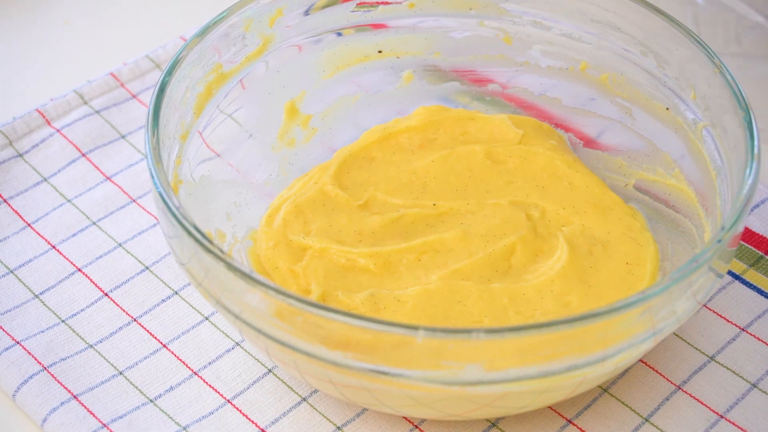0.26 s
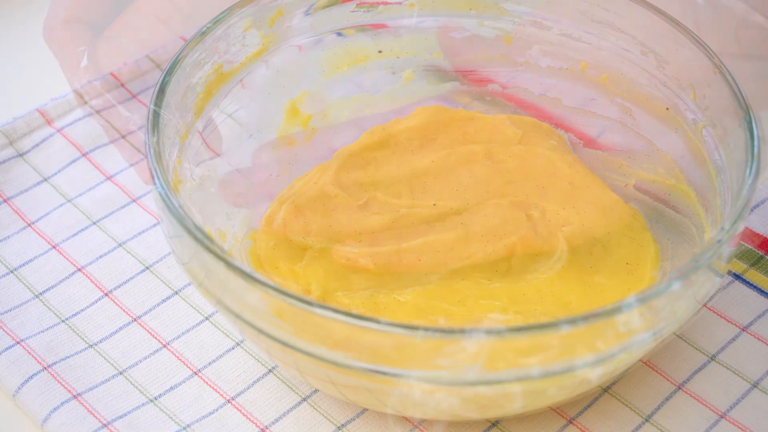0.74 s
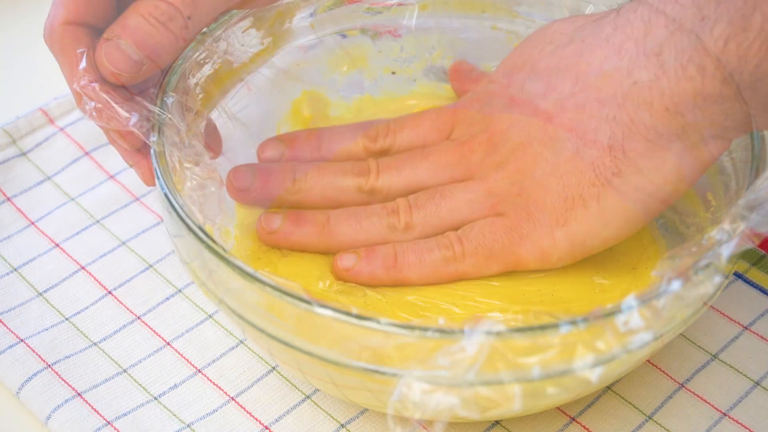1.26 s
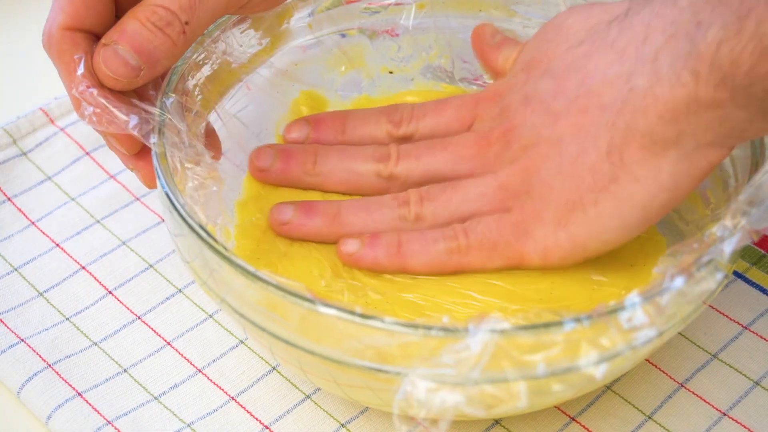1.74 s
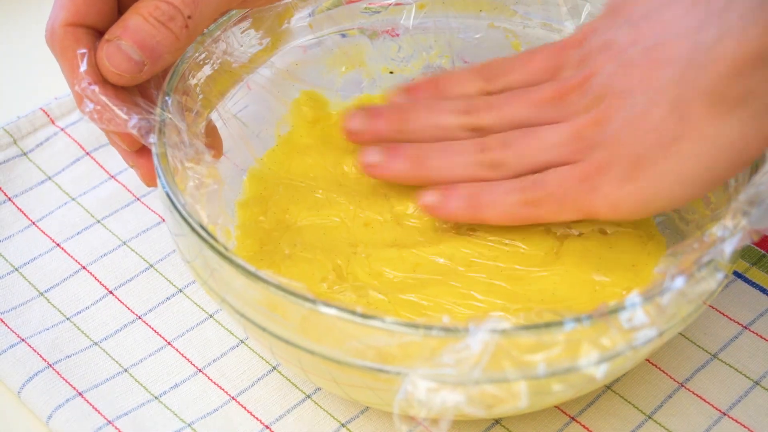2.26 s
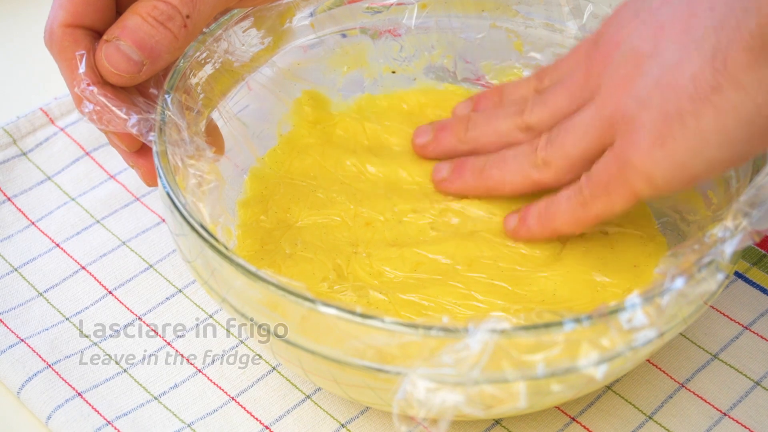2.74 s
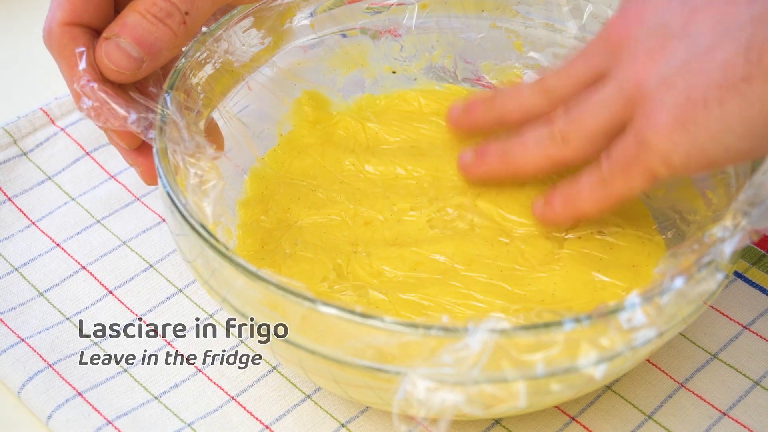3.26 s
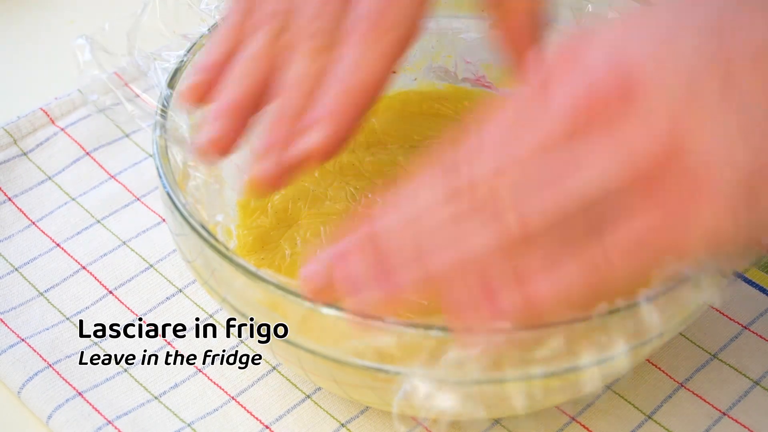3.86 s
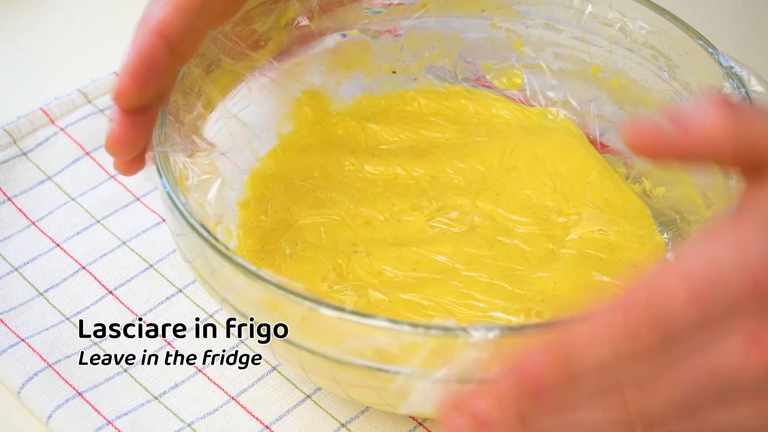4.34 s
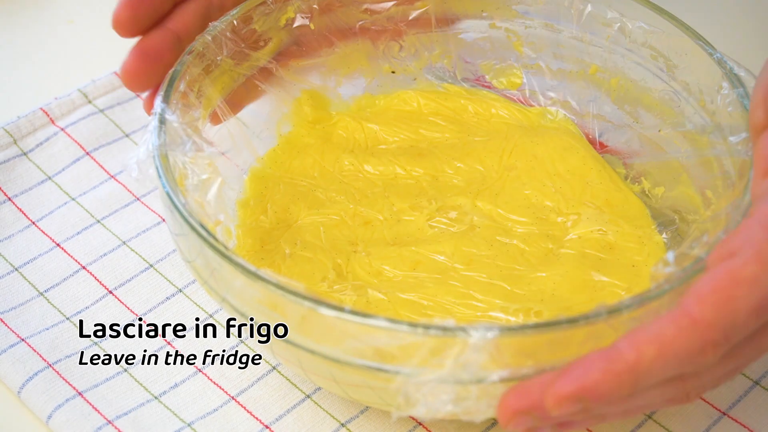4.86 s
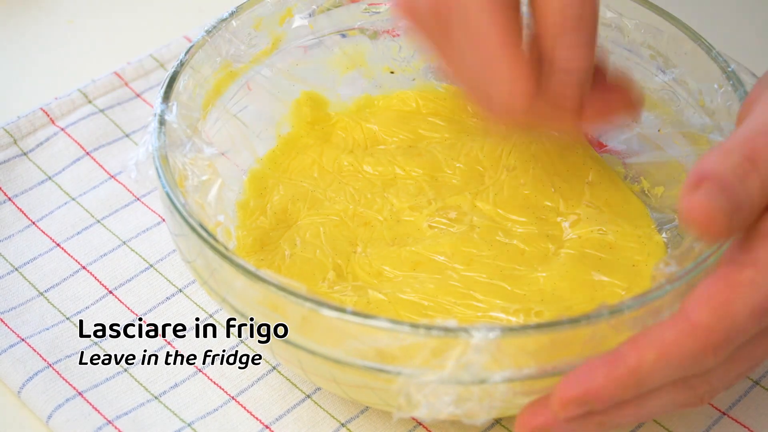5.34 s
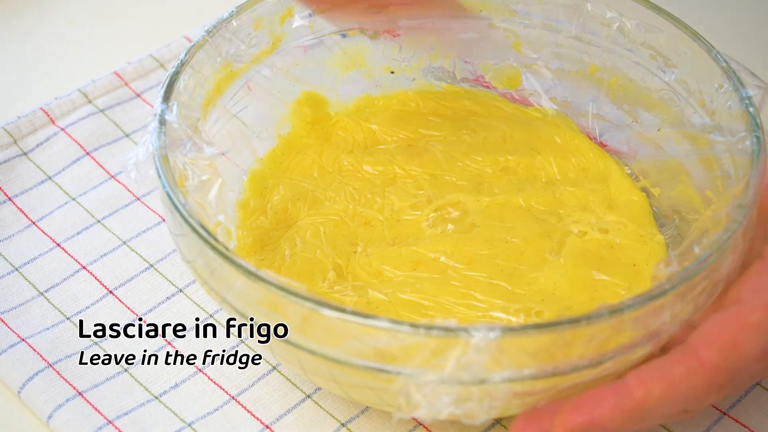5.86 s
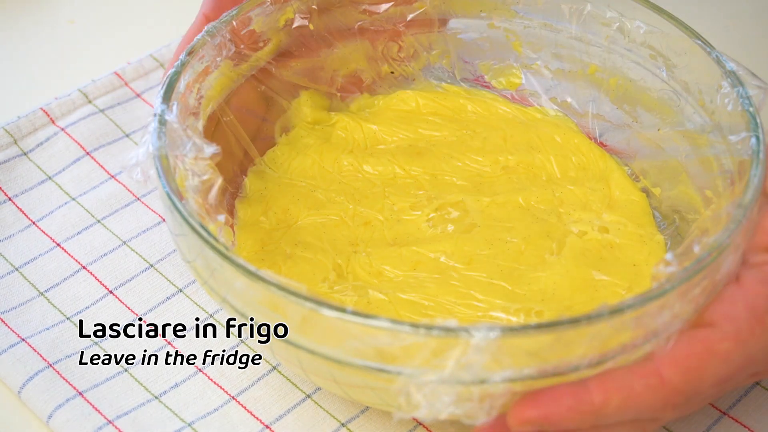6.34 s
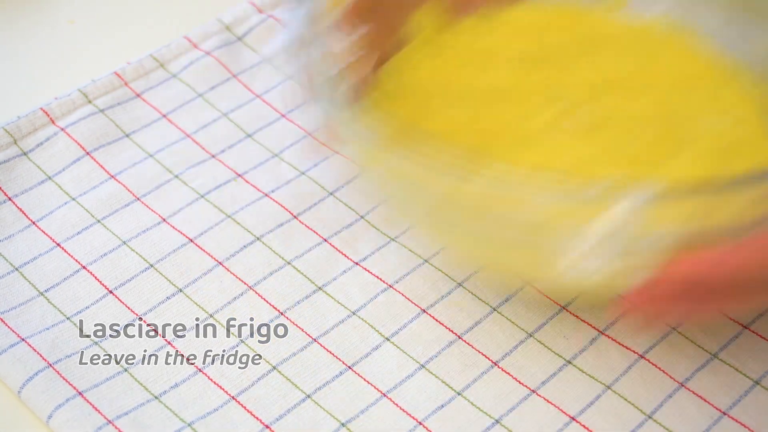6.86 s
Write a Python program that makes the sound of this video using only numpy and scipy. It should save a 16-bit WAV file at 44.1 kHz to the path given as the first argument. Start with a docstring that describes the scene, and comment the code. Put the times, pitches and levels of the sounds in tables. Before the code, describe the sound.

After a quiet second of low hum, cling film crinkles brightly as palms press it onto soft custard, then scrapes and snaps along the rim.

```python
"""Small kitchen: hands press cling film onto soft custard in a glass bowl, then smooth it round the rim.
Film: pitched grains make taut ticks, slack crackle, runs and faint rustles; rim strokes add a noise
rasp; wrinkles snap as damped rings with noise cracks.
Palms rub the film (uneven coloured noise) and nudge the bowl (short low noise swells).
Behind: a short room tail, drifting hum tones with a lower beating tone, and soft coloured noise."""
import sys
import numpy as np
from scipy import signal
from scipy.fft import rfft, irfft, next_fast_len
from scipy.io import wavfile
from scipy.ndimage import uniform_filter1d, map_coordinates

SR = 44100
rng = np.random.default_rng(int(sys.argv[2]) if len(sys.argv) > 2 else 0)


def persist_wave(psi):
    """Save psi, clipped to +-1, as 16-bit WAV."""
    counts = np.round(np.clip(psi, -1, 1) * 32767).astype(np.int16)
    wavfile.write(sys.argv[1], SR, np.atleast_2d(counts).T)


N = 312801


def amp(db):
    """Amplitude ratio from dB."""
    return 10 ** (np.asarray(db) / 20)


def unit(x):
    """Scale to rms 1."""
    return x / np.sqrt(np.mean(x ** 2) + 1e-20)


def along(points, hz):
    """Interpolate (f/Hz, value) points on a log frequency axis."""
    f, v = np.transpose(points)
    return np.interp(np.log(hz + 1), np.log(f + 1), v)


def level(rows):
    """Gain per sample from (t/s, level/dB) rows; silent beyond 1/30 s outside them."""
    s, db = np.transpose(rows)
    t = np.arange(N) / SR
    inside = (t > s[0] - 1 / 30) * (t < s[-1] + 1 / 30)
    return amp(np.interp(t, s, db)) * inside


def wobble(knots_per_s):
    """Smooth random curve through normally distributed knots."""
    knots = rng.standard_normal(int(N * knots_per_s / SR) + 4)
    return map_coordinates(knots, [np.arange(N) * knots_per_s / SR])


def filtered(x, response):
    """Multiply the spectrum of x by a function of frequency."""
    m = next_fast_len(len(x) + 8192)
    return irfft(rfft(x, m) * response(np.fft.rfftfreq(m, 1 / SR)), m)[:len(x)]


def resonance(f, centre_hz, width_hz):
    """Causal response of one mode, unity at its centre."""
    return 1j * f * width_hz / (centre_hz ** 2 - f * f + 1j * f * width_hz)


def noise(spectrum):
    """Gaussian noise of rms 1, coloured by (f/Hz, level/dB) points."""
    return unit(filtered(rng.standard_normal(N), lambda f: amp(along(spectrum, f))))


def add(track, s, sound):
    """Mix a sound into the track at time s."""
    part = track[max(round(s * SR), 0):][:len(sound)]
    part += sound[:len(part)]


def gesture(start_s, length_s, attack_s, release_s, sag_db_per_s):
    """Gain of one hand move: swells up to its start, eases slowly, lets go exponentially."""
    t = np.arange(N) / SR - start_s
    swell = np.maximum(-t, 0) / attack_s
    fade = np.maximum(t - length_s, 0) / release_s
    return np.exp(-swell - fade) * amp(-sag_db_per_s * np.clip(t, 0, length_s))


def effort(moves, attack_s, release_s, sag_db_per_s):
    """One gain curve per level column of a move table; overlapping moves add in power."""
    power = 0
    for s, length_s, *levels_db in moves:
        move = gesture(s, length_s, attack_s, release_s, sag_db_per_s)
        power = power + (amp(levels_db)[:, None] * move) ** 2
    return np.sqrt(power)


def resting(start_s, end_s):
    """Gain of the light contact that lasts through a whole span."""
    return gesture(start_s, end_s - start_s, attack_s=.005, release_s=0.079, sag_db_per_s=0)


def grains(starts, pitch_hz, spread, life_s, rough, scatter_db, length, size=220):
    """Tiny film patches flip, each with its own pitch and strength; big, low patches last longer."""
    n, k = len(starts), np.arange(size)
    top_hz = SR * rng.uniform(1 / 4, 2 / 5, (n, 1))
    hz = np.minimum(pitch_hz * np.exp(spread * rng.standard_normal((n, 1))), top_hz)
    scatter = np.minimum(rng.exponential(size=(n, 1)), np.pi)
    strength = amp(scatter_db * scatter) * np.sqrt(hz / pitch_hz)
    age = k / SR / life_s * np.sqrt(hz / pitch_hz)
    # a crumpled patch never holds its pitch
    jitter = rough * np.sqrt(hz / SR) * rng.standard_normal((n, size))
    turns = np.cumsum(hz / SR + jitter, axis=1)
    rings = strength * np.sin(2 * np.pi * turns) * age * np.exp(-age)
    places = starts.astype(int)[:, None] + k
    return np.bincount(places.ravel(), rings.ravel(), length + size)[:length]


def crackle(rate_per_s, pitch_hz, spread, life_s, rough, scatter_db, clump_db):
    """Continuous crackle of clumped grains, its slower level swings evened out; rms 1."""
    chance = np.cumsum(amp(clump_db * wobble(110)))
    starts = np.searchsorted(chance, rng.random(int(rate_per_s * N / SR)) * chance[-1])
    x = grains(starts, pitch_hz, spread, life_s, rough, scatter_db, N)
    local_power = np.abs(uniform_filter1d(x ** 2, size=2400))
    return unit(x / np.sqrt(local_power + np.mean(x ** 2) / 20))


# hand presses film onto custard: t/s, length/s, taut ticking gain/dB, slack crackle gain/dB
PRESSES = [(.975, 0.0244, -66, -63), (1.088, 0.0285, -52, -63), (1.16, 0.0148, -60, -59.5),
           (1.24, 0.1, -55.5, -65.5), (1.46, 0.0305, -54.5, -61), (1.54, .02, -60, -58.5),
           (1.58, 0.207, -55.5, -61), (1.83, 0.0464, -55.5, -60.5), (1.895, 0.0327, -59.5, -60),
           (2.03, 0.213, -59, -64.5), (2.225, 0.134, -64.5, -62), (2.385, 0.0502, -54, -60.5),
           (2.475, 0.028, -56.5, -62), (2.525, 0.029, -73.5, -63.5), (2.595, 0.0121, -54, -64.5),
           (2.65, 0.0091, -65, -65.5), (2.70, 0.021, -66.5, -60.5), (2.775, 0.095, -55.5, -62),
           (2.878, 0.0203, -66, -65), (2.965, 0.0067, -60.5, -63.5), (2.998, 0.0197, -59, -63),
           (3.098, 0.0308, -51, -57), (3.185, 0.05, -58.5, -58.5), (3.275, 0.058, -59.5, -66),
           (3.38, 0.177, -57, -65), (3.57, 0.123, -67.5, -61)]
# colour of the taut ticking: f/Hz, gain/dB
TAUT_COLOUR = [(2000, -15), (3000, 4), (6000, 2.5), (9500, -1), (14500, 4), (16000, -12.5)]
# the crackle eases as the wrinkles flatten
PRESS_ATTACK_S, PRESS_RELEASE_S, PRESS_SAG_DB_PER_S = 0.0149, 0.00624, 7
PRESSING_FROM_S, PRESSING_TO_S = .97, 3.85
REST_TAUT_DB, REST_SLACK_DB = -74, -82.5  # the resting hand keeps the film crackling faintly


def pressing():
    """Under each press taut film ticks brightly and slack film on the custard crackles lower."""
    taut_gain, slack_gain = effort(PRESSES, PRESS_ATTACK_S, PRESS_RELEASE_S, PRESS_SAG_DB_PER_S)
    rest = resting(PRESSING_FROM_S, PRESSING_TO_S)
    taut = crackle(rate_per_s=570, pitch_hz=6846, spread=0.5233, life_s=0.000252, rough=0.2865,
                   scatter_db=3.0, clump_db=5)
    taut = unit(filtered(taut, lambda f: amp(along(TAUT_COLOUR, f))))
    slack = crackle(rate_per_s=750, pitch_hz=1186.6, spread=0.503, life_s=0.00071, rough=0.299,
                    scatter_db=4.0, clump_db=3.5)
    ticking = np.hypot(taut_gain, amp(REST_TAUT_DB) * rest) * taut
    crackling = np.hypot(slack_gain, amp(REST_SLACK_DB) * rest) * slack
    return ticking + crackling


# film dragged over glass: f/Hz, relative level/dB per Hz
RASP_COLOUR = [(1200, -44.5), (2300, -3.5), (3200, 7.5), (4000, 2.5), (7000, 0), (11000, -5), (16000, -9.5)]
SMOOTHING_FROM_S, SMOOTHING_TO_S = 3.85, 7.0
REST_RIM_DB = -68.5  # contact of the hand that holds the rim


def smoothing(drag):
    """Dragged over the rim, the film's grains crowd into a rasp: fine crackle plus uneven noise."""
    fine = crackle(rate_per_s=1100, pitch_hz=6973, spread=0.534, life_s=0.000242, rough=0.214,
                   scatter_db=7, clump_db=4)
    rasp = unit(noise(RASP_COLOUR) * amp(2.5 * wobble(500) + wobble(40)))
    contact = np.hypot(drag, amp(REST_RIM_DB) * resting(SMOOTHING_FROM_S, SMOOTHING_TO_S))
    return contact * (amp(-4.0) * fine + amp(-3.5) * rasp)


# wrinkles that snap: t/s, peak before trim and film filter/dB, patch f/Hz, crack gain re patch ring/dB
SNAPS = [(0.975, -32.5, 8510, -9), (0.987, -31.5, 920, 23), (1.037, -36, 3910, 16), (1.06, -33, 8500, -9),
         (1.091, -28.5, 3215, -3), (1.199, -31.5, 3180, 4.5), (1.238, -31.5, 2690, 3),
         (1.25, -27, 3210, 15), (1.282, -28.5, 13100, 2.5), (1.357, -34.5, 3300, 2),
         (1.369, -33, 2810, -0.5), (1.392, -29.5, 4620, 9), (1.574, -36.5, 2620, -5.5),
         (1.59, -38, 1156, -0.5), (1.603, -31, 2910, -4), (1.727, -31, 3410, 3.5), (1.772, -33.5, 3160, 1),
         (1.83, -38.5, 3430, 4.5), (1.845, -30, 2980, -11.5), (1.93, -42, 1725, -1), (2.024, -30, 3270, 0),
         (2.143, -37.5, 1295, 11), (2.176, -41.5, 1500, -6), (2.355, -33, 1907, -25),
         (2.394, -31, 3420, -22), (2.413, -33, 4970, -24.5), (2.584, -34, 8200, -6.5),
         (2.602, -33.5, 4030, -7.5), (2.701, -41.5, 3200, -17.5), (2.734, -40.5, 2680, -8.5),
         (2.767, -31, 4500, 5.5), (2.78, -26.5, 4800, -17), (2.812, -34.5, 4860, -20.5),
         (2.852, -26.5, 7100, -35), (2.892, -34.5, 7240, -20), (3.075, -22, 2726, 10),
         (3.113, -28, 5720, -15), (3.153, -27.5, 6350, -17), (3.165, -27.5, 2344, -1.5),
         (3.226, -36.5, 2570, -15.5), (3.265, -38.5, 1520, -0.5), (3.288, -33, 5380, -26),
         (3.401, -29, 4970, -2), (3.442, -33.5, 8720, -19.5), (3.473, -36, 5730, -13.5),
         (3.514, -32, 2230, -4.5), (3.535, -29.5, 4650, -4), (3.59, -38, 1420, 18.5),
         (3.766, -40, 7040, -13), (3.882, -38, 3270, -3.5), (4.632, -39, 3160, -5), (4.812, -27, 2960, 2.5),
         (4.846, -22.5, 3364, -5.5), (4.872, -25.5, 3200, 13.5), (4.937, -31.5, 3200, -1),
         (5.004, -25.5, 2970, -4), (5.023, -36, 3100, 0.5), (5.109, -29.5, 3170, 23),
         (5.506, -26.5, 3340, 10), (5.648, -35.5, 13000, -17.5), (5.676, -34.5, 3450, 6.5),
         (5.693, -35.5, 8000, -23), (5.728, -32.5, 6100, -16.5), (5.759, -32, 7000, -9.5),
         (5.772, -34, 3190, -14.5), (5.964, -37.5, 3130, -2.5), (6.294, -31, 2890, -3.5),
         (6.313, -36.5, 2770, -2.5), (6.374, -30, 11700, -11.5)]
FLUTTER_BEFORE_S, FLUTTER_AFTER_S = .0013, .002  # time constants either side of the snap
CRACK_S, SNAP_TRIM_DB = .0004, -0.5


def snaps(cycles=1.687, flutter_db=-22, side_db=-9, side_s=.0016, wide_ratio=0.424, wide_db=-16):
    """A wrinkle buckles with a crack and a few patch cycles, and the sheet flutters."""
    out, t = np.zeros(N), np.arange(-(SR // 100), SR // 40) / SR
    since, until = np.maximum(t, 0), np.maximum(-t, 0)

    def burst(u):
        """Fast rise, slower decay around u = 0."""
        return np.exp(-np.maximum(u, -2 * u) / CRACK_S)

    def ring(turns, life):
        """Damped ring with a soft onset; life in cycles."""
        return np.sin(2 * np.pi * turns) * (1 - np.exp(-5 * turns)) * np.exp(-turns / life)

    for s, db, hz, crack_db in SNAPS:
        turns = hz * since * (1 + hz * since / 100) ** -.1  # pitch sags slightly
        # the wider area around the patch gives one lower push
        patch = ring(turns, cycles) + amp(wide_db) * ring(wide_ratio * turns, cycles / 2)
        crack, flutter = rng.standard_normal((2, len(t)))
        # softer cracks close to the main one
        early_s, late_s = side_s * rng.uniform(.6, 2, 2)
        side_cracks = burst(t + early_s) + burst(t - late_s)
        crack = crack * (burst(t) + amp(side_db) * side_cracks)
        crack = filtered(crack, lambda f: resonance(f, 6100, 11600))
        # thin flutter: little below the patch's pitch
        flutter = flutter * np.exp(-since / FLUTTER_AFTER_S - until / FLUTTER_BEFORE_S)
        flutter = filtered(flutter, lambda f: f / np.hypot(f, hz / 2))
        snap = patch + amp(crack_db) * crack
        snap = snap / np.abs(snap).max() + amp(flutter_db) * flutter
        add(out, s + t[0] + 1 / 1000, amp(db) * snap)
    return amp(SNAP_TRIM_DB) * out


# crackle runs and longer faint rustles near one pitch:
# t/s, length/s, rms before trim and film filter/dB, grain f/Hz, pitch spread/log ratio
RUNS = [(1.09, 0.022, -53, 3130, 0.526), (1.23, 0.0564, -54, 3030, 0.452),
        (1.457, 0.0373, -56, 3140, 0.205), (1.572, 0.065, -58.5, 976, 0.14),
        (1.588, 0.1495, -60, 3194, 0.107), (1.828, 0.0207, -47, 3767, 0.732),
        (2.012, 0.0265, -50, 4890, 0.546), (2.141, 0.0395, -63, 1400, 0.138),
        (2.218, 0.2106, -59, 2870, 0.087), (2.309, 0.108, -66.5, 1450, 0.19),
        (2.76, 0.0311, -50.5, 5520, 0.434), (3.261, 0.01236, -53, 1445, 0.188),
        (3.391, 0.01684, -47, 4626, 0.63), (3.504, 0.0364, -46, 3392, 0.889),
        (3.956, .09, -50, 3070, 0.138), (4.067, .025, -56, 1610, 0.21), (4.244, 0.055, -50.5, 3750, 0.392),
        (4.811, 0.0944, -54, 3407, 0.134), (5.408, 0.0716, -57.5, 1146, 0.097),
        (5.509, .02, -44.5, 6753, 0.565), (5.762, 0.014, -43, 7616, 0.434),
        (5.993, 0.321, -63, 2978, 0.109), (6.279, 0.1065, -60, 2800, 0.132)]
RUN_TRIM_DB = -1.5


def runs(rate_per_s=1000):
    """Crackle runs and faint rustles: grains thicken, then thin out, along each run."""
    out = np.zeros(N)
    for s, length_s, db, hz, spread in RUNS:
        n = int(length_s * SR) + 1
        starts = rng.beta(1.6, 1.6, int(rate_per_s * n / SR) + 1) * n
        run = grains(starts, hz, spread, life_s=0.000527, rough=0.087, scatter_db=5.0,
                     length=n + SR // 200)
        add(out, s, amp(db + RUN_TRIM_DB) * unit(run))
    return out


# air modes of the covered bowl: f/Hz, width/Hz, gain/dB
CAVITY = [(725, 187, 0), (1314.7, 85.5, 0)]


def film_colour(f):
    """Thin sheet has little bass, bowl air rings; the microphone adds a peak near 3 kHz, dip just above."""
    cavity = sum(amp(db) * resonance(f, hz, width_hz) for hz, width_hz, db in CAVITY)
    bass_cut = (1j * f / (1j * f + 450)) ** 2
    microphone = -.7j * resonance(f, 3361, 200)
    return bass_cut * (1 + cavity + microphone)


def film(drag):
    """Crackle, rasp, snaps and runs all pass through the same colour."""
    return filtered(pressing() + smoothing(drag) + snaps() + runs(), film_colour)


# skin on film: f/Hz, relative level/dB per Hz
RUB_COLOUR = [(150, -10), (450, -7.5), (750, 4), (1050, -3), (1700, -7), (2300, -7.5), (4000, -13),
              (10000, -47.5)]


def palms(rub):
    """Skin sticks and slips on the film: a duller rub, noise with a fast random gain."""
    return rub * unit(noise(RUB_COLOUR) * amp(3.87 * wobble(250)))


# hands push and scuff the bowl on its cloth: t/s, length/s, rms before trim/dB, centre f/Hz
NUDGES = [(.95, 0.0707, -58.5, 129.4), (1.069, 0.045, -64.5, 258), (1.244, 0.0634, -53, 81),
          (1.819, 0.084, -59.5, 139), (2.005, 0.102, -56, 77.5), (3.495, 0.082, -52.5, 89),
          (3.671, 0.146, -45, 21.2), (3.898, 0.0584, -55, 181.6), (3.931, 0.1204, -44.5, 57),
          (4.301, 0.178, -49, 68.3), (4.327, 0.0827, -49.5, 268.5), (4.339, 0.132, -57.5, 414),
          (4.45, 0.073, -51.5, 159.5), (4.776, 0.094, -61.5, 199), (4.995, 0.0545, -60.5, 167),
          (5.403, 0.083, -55.5, 513), (6.554, 0.047, -57.5, 127.7)]
NUDGE_TRIM_DB = -3


def bowl():
    """Soft pushes and scuffs: band-passed noise that swells and fades."""
    out = np.zeros(N)
    for s, length_s, db, hz in NUDGES:
        n = int(length_s * SR) + 2
        scuff = filtered(rng.standard_normal(n), lambda f: resonance(f, hz, 0.696 * hz) ** 2)
        add(out, s, amp(db + NUDGE_TRIM_DB) * unit(scuff * np.hanning(n)))
    return out


# decay of the room tail: f/Hz, t60/s
KITCHEN_T60 = [(200, 0.453), (3000, 0.118), (14000, 0.19)]


def kitchen(x):
    """The walls answer with a short noise tail: bass lingers, the range near 3 kHz dies first."""
    hz, t, z = signal.stft(rng.standard_normal(SR // 3), SR, nperseg=256)
    decay = amp(-60 * t / along(KITCHEN_T60, hz)[:, None])
    tail = signal.istft(z * decay, SR, nperseg=256)[1]
    delayed = np.pad(x, (SR // 300, 0))
    return signal.fftconvolve(delayed, tail / np.linalg.norm(tail))[:N]


# mains hum: t/s, level/dB
HUM_LEVEL = [(0, -49), (.5, -51), (.93, -53.5), (1, -48), (6, -48), (7.09, -50.5)]
# hum tones: f/Hz, level re hum/dB
HUM_LINES = [(50, -2.5), (81, -26), (250, -29.5)]
# lower tone that beats against the hum: t/s, level/dB
THROB_LEVEL = [(.94, -99), (.98, -53.5), (1.3, -57.5), (1.7, -69), (2.5, -66.5), (7.09, -73.5)]
# room noise colour: f/Hz, relative level/dB per Hz
AIR_COLOUR = [(20, 15.5), (70, 14.5), (130, 2), (230, 2), (350, 0.5), (500, -3.5), (750, -5), (1600, -10),
              (2400, -10.5), (3200, -7), (4200, -15), (8000, -23.5), (16000, -29)]
# room noise: t/s, level/dB
AIR_LEVEL = [(0, -63), (.9, -60.5), (1.2, -61.5), (6.5, -60.5), (7.09, -57)]
HUM_DRIFT_RAD, THROB_DRIFT_RAD, THROB_HZ = 0.28, 0.32, 37.6


def background():
    """Mains hum with drifting phase, a lower tone beating against it, and soft room noise."""
    t = np.arange(N) / SR

    def tone(hz, drift_rad):
        """Sine of rms 1 whose phase wanders."""
        return np.sqrt(2) * np.sin(2 * np.pi * hz * t + drift_rad * wobble(1.484))

    hum = sum(amp(db) * tone(hz, HUM_DRIFT_RAD) for hz, db in HUM_LINES)
    throb = tone(THROB_HZ, THROB_DRIFT_RAD)
    return level(HUM_LEVEL) * hum + level(THROB_LEVEL) * throb + level(AIR_LEVEL) * noise(AIR_COLOUR)


# hand sweeps film down over the rim: t/s, length/s, film rasp gain/dB, palm rub gain/dB
STROKES = [(3.905, 0.089, -71.5, -57), (3.975, 0.1467, -48.5, -51.5), (4.18, 0.063, -58, -63),
           (4.275, 0.3414, -48, -57), (4.82, 0.0835, -45, -58), (4.94, 0.101, -57, -67.5),
           (5.10, 0.0233, -48.5, -63), (5.18, 0.093, -64.5, -84), (5.37, 0.0152, -59, -60),
           (5.44, 0.042, -56, -53), (5.56, 0.0135, -58, -63), (5.765, 0.0397, -56, -72.5),
           (5.93, 0.222, -65, -70.5), (6.15, 0.2045, -55.5, -71.5), (6.53, 0.049, -62, -75),
           (6.69, 0.014, -61, -71), (7.01, 0.076, -62, -77)]
# the hand slows as it goes
STROKE_ATTACK_S, STROKE_RELEASE_S, STROKE_SAG_DB_PER_S = 0.0246, 0.0428, 5.5


def scene():
    """Each stroke drives both film and palm; the kitchen answers."""
    drag, rub = effort(STROKES, STROKE_ATTACK_S, STROKE_RELEASE_S, STROKE_SAG_DB_PER_S)
    near = film(drag) + palms(rub) + bowl()
    return (near + amp(-13.5) * kitchen(near) + background())[None]


TOP_HZ = 16300


def record(dry):
    """Nothing is kept above the band limit."""
    return np.array([filtered(x, lambda f: f < TOP_HZ) for x in dry])


dry = scene()
out = record(dry)
persist_wave(out)
```